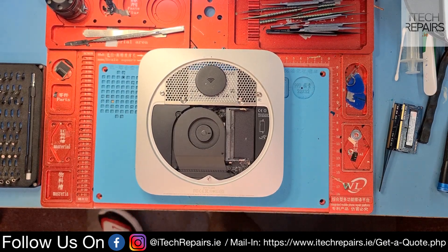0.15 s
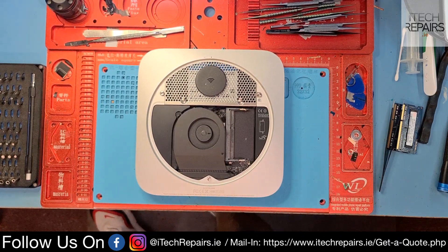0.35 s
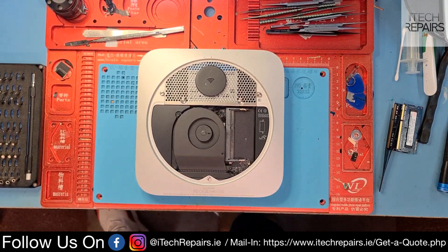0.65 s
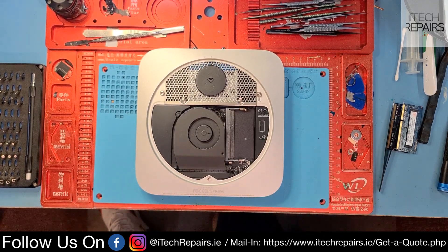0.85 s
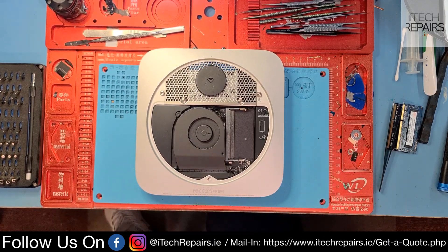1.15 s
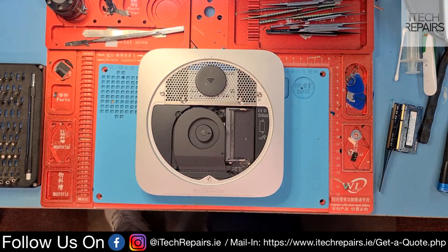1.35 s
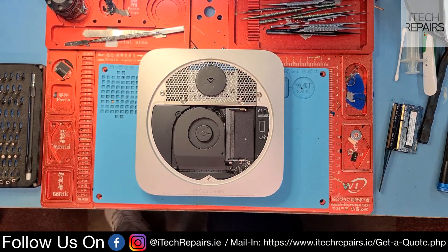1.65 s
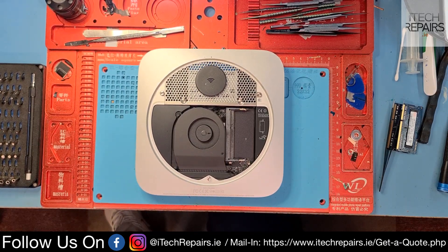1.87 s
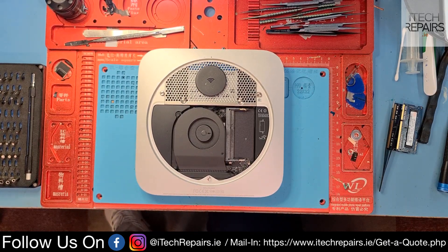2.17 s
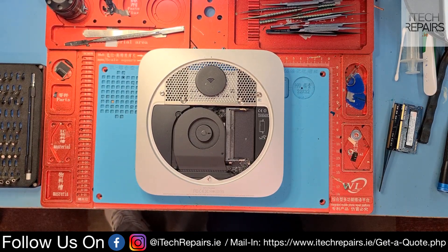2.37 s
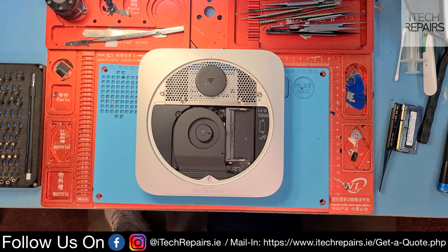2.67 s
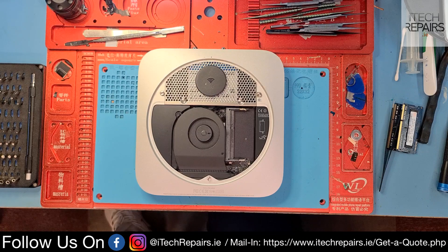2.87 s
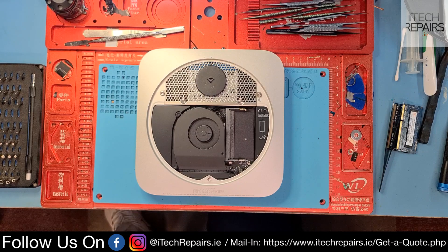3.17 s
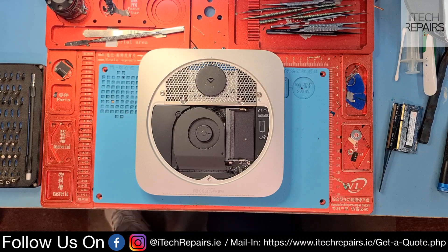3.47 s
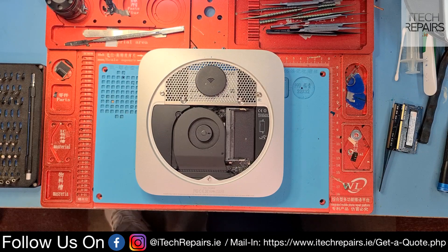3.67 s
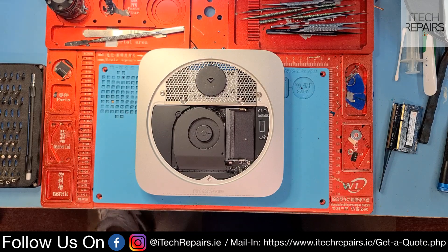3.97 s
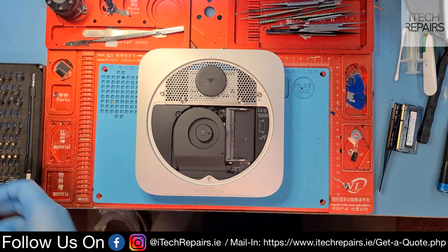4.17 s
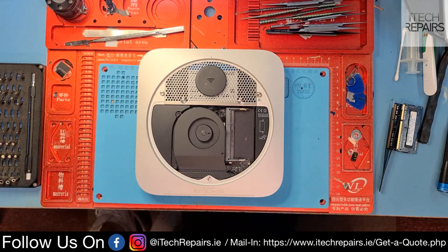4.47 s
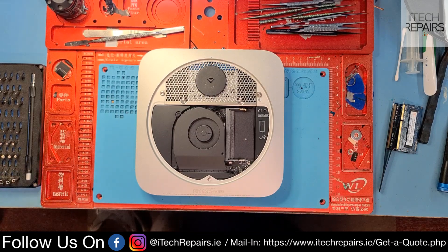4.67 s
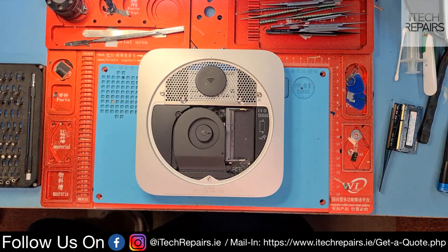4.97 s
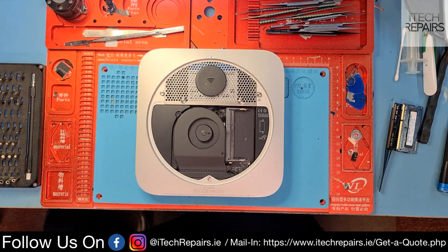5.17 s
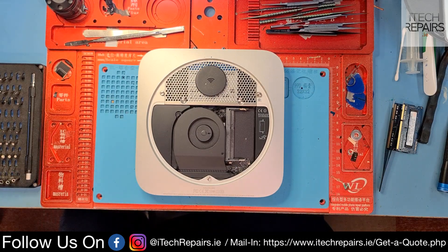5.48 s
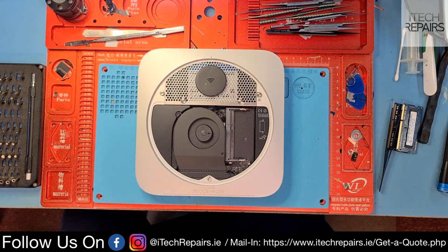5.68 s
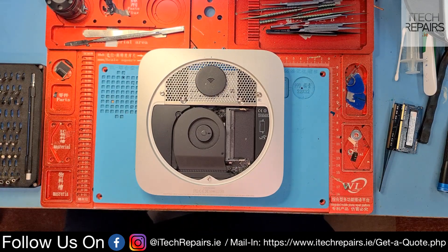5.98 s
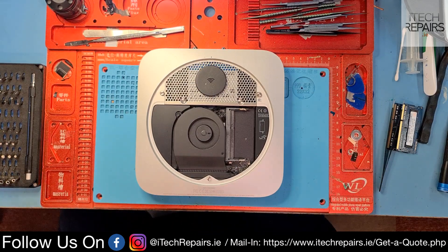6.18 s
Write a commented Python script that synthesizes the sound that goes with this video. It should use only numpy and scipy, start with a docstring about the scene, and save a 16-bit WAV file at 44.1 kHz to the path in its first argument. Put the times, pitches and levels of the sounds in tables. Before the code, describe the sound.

Close stereo microphones at a repair bench in a quiet, fairly live room. A soft thud, then light metal clinks and scuffs with low bench rumble in the first second. After a lull, plastic and circuit-board taps quicken around three seconds, with one firm snap. A loud, bright metal clatter rings to the right past four seconds, followed by a low slide, faint scuffs and a final click.

```python
"""A repair bench in a quiet, fairly live room, two microphones close to the work.
Plastic and circuit board tap and snap close by: brief noise cracks and damped modes.
Loose metal pieces clatter to the right, each blow ringing and followed by smaller bounces.
Fingers and small things scuff in runs of noisy slips; three slides and some blows shake the bench.
Sleeves brush over the bench, under them lies faint room air, and a dense noise tail is the room."""
import sys
import numpy as np
from scipy import signal
from scipy.fft import rfft, irfft
from scipy.io import wavfile
from scipy.ndimage import uniform_filter1d

SR = 44100
rng = np.random.default_rng(int(sys.argv[2]) if len(sys.argv) > 2 else 0)


def store_wav(level_fs):
    """Save 16-bit WAV to argv[1]."""
    pcm = np.round(np.clip(np.atleast_2d(level_fs), -1, 1) * 32767)
    wavfile.write(sys.argv[1], SR, pcm.T.astype(np.int16))


N = 279153
T = np.arange(N) / SR
HIT_T = T[:SR // 3]  # time axis of one short contact
LEAD_S = .01  # room for the graze ahead of each hit
# colour of a hard contact: f/Hz, relative level/dB per Hz
CONTACT_COLOUR = [(150, -12.5), (480, -1.5), (850, -4), (1150, 4.5), (2200, 1.5), (3800, -0.7),
                  (7000, -4.5), (11000, -0.5), (13300, -7.5)]


def taps(body_db=-2.5, ring_room_db=-6, favoured_t60=0.021, overtone_ratio=1.6, overtone_db=-12.5):
    """Each tap cracks and rings the plastic; the spot that is hit favours one mode and its overtone."""
    # light taps: t/s, level/dB, low knock/dB, treble/dB, favoured f/Hz, its ring/dB against the level,
    # contact/ms, room send/dB, left minus right/dB
    tap_list = [(0.345, -68.5, -4, -48, 1280, 12.5, 0.42, 5.5, -4),
                (1.0643, -46, -1.5, -20, 1890, -3.5, 1.8, 2.5, 0.5),
                (1.635, -73, 22, -34, 832, 20, 6.2, -9, -1), (2.539, -52, 6.5, -12, 1466, 1, 0.86, -2.5, 2),
                (2.740, -42, 3, -16, 1466, -6.5, 0.82, -3.5, 0.5),
                (2.949, -58.5, 9, -16, 2070, 12.5, 0.65, -4, 4),
                (2.970, -49.5, 0, -10, 2060, 14, 2.6, -10, 3),
                (2.98, -64.5, 2, 22, 2070, 29.5, 1.6, -8, -2),
                (3.0156, -37.5, 2.5, -12, 1560, -2, 0.96, -4.5, -2),
                (3.342, -37.5, 0, -15.5, 2030, -16, 0.86, -4.5, 2.5),
                (3.388, -45.5, 2, -16.5, 2090, 4, 0.38, -3, 3.5),
                (3.4582, -28.5, -6, -13, 875, -5, 0.65, -5, -2),
                (3.7172, -43.5, -11, 3, 1730, -4, 2.6, -3.5, -6),
                (3.7206, -47.5, -25, 8.5, 6630, -2.5, 0.71, -2.5, 6),
                (3.975, -58.5, 5, -13, 4580, -6, 0.099, 6, 6), (4.947, -61, 12, -10, 860, 6, 3.4, -2, -1),
                (5.4188, -60, 11, 0.5, 1990, 7, 1.9, 1.5, -1),
                (5.789, -53, 6.5, -63, 1727, -10, 1.5, 9, -5), (6.26, -44, -4, 7, 3056, 6, 1.6, -4.5, -1.5),
                (6.262, -63, -7, -15, 880, 13.5, 1.4, 2.5, -9)]
    # modes of the tapped plastic: f/Hz, relative level/dB, t60/s
    plastic_modes = [(587, 0.5, 0.016), (880, -19, 0.045), (1382, -8.5, 0.0053), (1774, 5, 0.015),
                     (2138, -2.5, 0.031), (3500, 0.5, 0.012), (4540, -16.5, 0.032), (5890, -10, 0.025)]
    near, sent = np.zeros((2, 2, N))
    for s, db, low_db, top_db, hz, ring_db, contact_ms, room_db, pan_db in tap_list:
        snap = undb(db) * tone(crack(contact_ms, apart_hz=3550), low_db, top_db)
        snap = colour(snap, [(9000, -2.5), (14000, -8.0)])  # plastic is softer than metal
        body = undb(db + body_db) * tone(ring(plastic_modes, contact_ms, spread=0.27), low_db, top_db)
        pitches = [(hz, 0, favoured_t60), (overtone_ratio * hz, overtone_db, favoured_t60)]
        favoured = undb(db + ring_db) * ring(pitches, 1.22 * contact_ms, spread=0.59)
        pan = undb(np.array([[pan_db], [-pan_db]]) / 2)
        add(near, s - LEAD_S, (bench(snap + body) + favoured) * pan)
        # rings carry less far than cracks
        add(sent, s - LEAD_S, (snap + undb(ring_room_db) * (body + favoured)) * undb(room_db))
    return near, sent


def clatter(lag_ms=.32, side_db=2.0, shimmer_db=-6, shimmer_t60=0.076, detune=0.0053):
    """Metal pieces strike and bounce right of the microphones; their ring comes from all over the metal."""
    # metal pieces knocking together: t/s, level/dB, low knock/dB, treble/dB, contact/ms,
    # ring/dB against the level, room send/dB
    clatter_list = [(.686, -37, 2.5, -5, 0.42, -4, -17), (.696, -46.5, 14, -2, 1.4, -4, 3),
                    (.977, -50.5, 0, -5.5, 0.87, -1.5, -2), (1.194, -51.5, -15, -1, 0.85, -7.5, 0),
                    (4.3437, -39.5, -10.5, 2, 2.6, 2.5, -13.5), (4.3557, -25, -1, -1, 0.51, 4, -15.5),
                    (4.3667, -28, 4.5, -9, 1.04, -2, -6.5), (4.517, -46.5, 6.5, -4, 1.7, -6, -20)]
    # modes of the metal pieces: f/Hz before detuning, relative level/dB, t60/s
    metal_modes = [(315.6, -18, 0.53), (820, -14, 0.11), (1211, -15.5, 0.12), (1760, 0.5, 0.07),
                   (2075, -3.5, 0.13), (2180, -0.5, 0.12), (2310, 1, 0.061), (2412, -2, 0.088),
                   (2476, 5.5, 0.055), (2800, -11, 0.082), (3044, -5.5, 0.13), (3140, 2, 0.05)]
    near, sent = np.zeros((2, 2, N))
    for s, db, low_db, top_db, contact_ms, ring_db, room_db in clatter_list:
        # pieces lying on each other ring a little differently at every blow
        modes = [(hz * (1 + detune * rng.standard_normal()), mode_db, t60)
                 for hz, mode_db, t60 in metal_modes]
        # the left microphone hears the strike softer and later
        strike = crack(contact_ms, apart_hz=6100) * undb([[-side_db], [side_db]])
        strike[0] = np.roll(strike[0], int(lag_ms * SR / 1000))
        shimmer = undb(shimmer_db) * small_part(shimmer_t60, contact_ms, count=48)
        ringing = undb(ring_db) * ring(modes, contact_ms, spread=0.89)
        hit = undb(db) * tone(strike + shimmer + ringing, low_db, top_db)
        hit = signal.fftconvolve(hit, rattle(), axes=1)
        add(near, s - LEAD_S, hit)
        add(sent, s - LEAD_S, hit * undb(room_db))
    return near, sent


def scuffs(grain_db=16.0, catch_db=1.5, part_db=-2, sag_octaves_per_s=.6, rub_room_db=-6):
    """Crackling slips swell and fade, hiss and ring a resonance that sinks as the contact moves along."""
    # fingers and small things rubbing: t/s, length/s, level/dB sent to the room (scene() lifts the near sound),
    # resonance f/Hz halfway through, its width/Hz, hiss/dB against the near resonance
    scuff_list = [(0.638, 0.043, -58.5, 2220, 494, -8), (0.701, 0.088, -57, 2640, 1200, -8),
                  (0.852, 0.073, -59.5, 2430, 600, -0.5), (0.983, 0.1, -67.5, 2170, 500, -4.5),
                  (1.079, 0.098, -69, 2080, 600, 4.5), (2.238, 0.035, -60, 1760, 300, -16),
                  (2.922, 0.095, -59, 1770, 350, -14), (3.177, 0.058, -70.5, 1860, 300, -23),
                  (3.582, 0.05, -76.5, 1700, 600, 2.5), (3.63, 0.081, -73.5, 2240, 220, -4),
                  (4.142, 0.28, -76.5, 1930, 500, -4.5), (4.388, 0.17, -57, 2060, 894, -15),
                  (4.588, 0.023, -67, 3820, 300, 5), (4.955, 0.056, -64, 3960, 350, 3),
                  (5.416, 0.007, -56.5, 2870, 395, -13), (5.401, 0.31, -71.5, 854, 109, -30),
                  (5.673, 0.02, -65, 3700, 880, -30), (5.736, 0.023, -66.5, 4500, 250, 0.5),
                  (5.785, 0.027, -62.5, 2080, 350, -35), (5.936, 0.02, -70.5, 4470, 251, -11)]
    near, sent = np.zeros((2, 2, N))
    count = len(HIT_T)
    for s, length, db, hz, width_hz, hiss_db in scuff_list:
        # each slip holds its own random level for a third of a millisecond
        slips = np.repeat(undb(grain_db * rng.uniform(-1, 1, count)), SR // 3000)[:count]
        # the grip tightens and lets go
        grip_walk = unit(uniform_filter1d(rng.standard_normal(count), size=400))
        catches = undb(catch_db * grip_walk)
        swell = np.sqrt(np.sin(np.pi * np.minimum(HIT_T / length, 1)).clip(0))
        friction = bench(pair(count, apart_hz=2500) * slips * catches * swell)
        grains = unit(colour(friction, CONTACT_COLOUR))
        sinking_hz = hz * 2 ** (-sag_octaves_per_s * (HIT_T - length / 2))
        rub = unit(resonate(grains, sinking_hz, width_hz))
        part_ring = small_part(0.05, rise_ms=.6, count=14)
        part = unit(signal.fftconvolve(friction, part_ring, axes=1)[:, :count])
        hiss = undb(hiss_db) * unit(tone(grains, -2.0, 0) + undb(part_db) * part)
        gain = undb(db) * np.sqrt(np.mean(swell ** 2))
        add(near, s, gain * (rub + hiss))
        add(sent, s, gain * (undb(rub_room_db) * rub + hiss))
    return near, sent


def rumble(boom_rise_s=0.03, knock_rise_s=0.011):
    """Slides and blows shake the bench at its low resonances; each blow also gives a short hollow knock."""
    # something sliding: t/s at full speed, length/s, rumble level/dB
    slide_list = [(0.896, 0.098, -42), (4.56, 0.33, -44), (5.8, .53, -58)]
    # blows that reach the bench: t/s, boom level/dB, hollow knock level/dB
    thud_list = [(0.344, -51, -53.5), (0.702, -43.5, -51.5), (1.065, -57, -57.5), (5.788, -74, -55),
                 (6.259, -48.5, -53)]
    # low resonances of the bench: f/Hz, relative level/dB per Hz
    shake_colour = [(22, -27), (31, -12), (41, 2), (52, -7), (66, 4), (85, -8), (125, -10.5), (165, -25.5),
                    (280, -28), (520, -62)]
    # hollow knock: f/Hz, relative level/dB per Hz
    knock_colour = [(70, -29), (170, 6.5), (340, 6.5), (520, -9), (1200, -58)]
    shake = unit(colour(pair(N, apart_hz=700), shake_colour, size=16384))
    shake = shake / np.sqrt(uniform_filter1d(np.mean(shake ** 2, axis=0), size=2500))  # an even push
    hollow = unit(colour(pair(N, apart_hz=700), knock_colour))
    slides = sum(undb(db) * stroke(s, length, rise_db_per_s=103.5, sag_db_per_s=13, stop_db_per_s=172)
                 for s, length, db in slide_list)
    booms = sum(undb(boom_db) * jolt(s, boom_rise_s) for s, boom_db, _ in thud_list)
    knocks = sum(undb(knock_db) * jolt(s, knock_rise_s) for s, _, knock_db in thud_list)
    return shake * np.hypot(slides, booms) + hollow * knocks


def background(air_db=-66.5, flicker_db=1.5):
    """Faintly wavering room air, and cloth that brushes unevenly with each arm movement."""
    # arm movements that brush a sleeve over the bench: t/s at full speed, length/s, level/dB
    brush_list = [(0, 0.019, -65.5), (0.714, 0.15, -58), (4.262, 0.14, -64), (5.15, 0.071, -69),
                  (5.844, 0.7, -66.5)]
    # brushing cloth: f/Hz, relative level/dB per Hz
    cloth_colour = [(100, -12), (280, 2), (600, -9.5), (1300, -10.5), (4000, -23), (12000, -33.5)]
    # quiet room air: f/Hz, relative level/dB per Hz
    air_colour = [(25, -12.5), (55, -5.5), (120, -13), (200, -13), (320, -8.5), (450, -20.5), (700, -20.5),
                  (1500, -31.5), (1900, -27), (3000, -37.5), (5400, -44.5), (7300, -38), (9000, -48.5),
                  (12500, -42), (15500, -61)]
    air = undb(air_db) * unit(colour(waver(pair(N, apart_hz=600)), air_colour, size=8192))
    flicker = unit(uniform_filter1d(rng.standard_normal(N), size=2400))
    cloth = unit(colour(pair(N, apart_hz=650), cloth_colour))
    # the negative sag lets a brush grow slightly
    moves = [undb(db) * stroke(s, length, rise_db_per_s=46.5, sag_db_per_s=-1, stop_db_per_s=29)
             for s, length, db in brush_list]
    return air + cloth * np.max(moves, axis=0) * undb(flicker_db * flicker)


def room(x, first_s=0.0053, early_db=7.0, early_s=0.031):
    """Dense reflections: strong early ones from bench and walls, then a tail whose top dies soonest."""
    # decay of the tail: f/Hz, t60/s
    room_t60 = [(200, 0.45), (2500, 0.32), (7000, 0.42), (14000, 0.21)]
    hz, s, frames = signal.stft(pair(SR, apart_hz=600), SR, nperseg=256)
    fade = undb(-60 * s / at(room_t60, hz)[:, None])
    tail = signal.istft(frames * fade, SR)[1][:, :SR]
    t = T[:SR]
    onset = 1 - np.exp(-(t / first_s) ** 2)
    tail = tail * onset * undb(early_db * np.exp(-t / early_s))
    tail = tail / np.sqrt(np.sum(tail ** 2) / 2)
    wet = signal.fftconvolve(x, tail, axes=1)[:, :N]
    return colour(wet, [(300, 4.5), (2200, 2.0), (5000, -0.5), (12000, 0.5)])


def crack(contact_ms, apart_hz, graze_db=-16, graze_length=6.5):
    """Two rough surfaces graze, then meet in a brief burst; slower contacts graze for longer."""
    age = (HIT_T - LEAD_S) * 1000 / contact_ms  # in contact lengths, as is graze_length
    pressed = np.maximum(age, 0)
    burst = np.sqrt(pressed) * np.exp(-pressed)
    graze = undb(graze_db) * np.exp(-abs(age) / graze_length) * np.minimum(HIT_T / LEAD_S, 1)
    return blow(colour(pair(len(HIT_T), apart_hz) * (burst + graze), CONTACT_COLOUR))


def ring(modes, rise_ms, spread):
    """Damped modes build up in the contact; higher ones differ more in phase between microphones."""
    t, out = np.maximum(HIT_T - LEAD_S, 0), 0
    for hz, db, t60 in modes:
        phase_gap = spread * np.sqrt(hz / 1500) * rng.standard_normal((2, 1))
        phase = rng.uniform(0, 2 * np.pi) + phase_gap
        out = out + undb(db - 60 * t / t60) * np.sin(2 * np.pi * hz * t + phase)
    return blow(out * (1 - np.exp(-(t * 1000 / rise_ms) ** 2)))


def small_part(t60, rise_ms, count):
    """The crowded high modes of a small piece, different wherever it is touched."""
    modes = [(hz, at(CONTACT_COLOUR, hz), t60) for hz in rng.uniform(3400, 12800, size=count)]
    return ring(modes, rise_ms, spread=0.9)


def tone(x, low_db, top_db):
    """Heavier blows carry more bass, harder ones more treble."""
    return colour(x, [(850, low_db), (1400, 0), (3000, 0.0057), (8000, top_db)])


def bench(x, echo_db=-5, shortest_ms=.9, longest_ms=3.5):
    """The bench top returns each contact a moment later, which gives it a hollow colour of its own."""
    lag = int(rng.uniform(shortest_ms, longest_ms) * SR / 1000)
    return (x + undb(echo_db) * np.roll(x, lag, axis=1)) / np.hypot(1, undb(echo_db))


def rattle(bounce_db=-17, bounce_s=.035, count=15):
    """A blow and the smaller, irregular bounces that follow it, of either sign."""
    train = np.zeros((1, len(HIT_T)))
    train[0, 0] = 1
    for s in rng.uniform(0.069, 2, count) * bounce_s:
        # the factor of 2 lifts every bounce by 6 dB
        train[0, int(s * SR)] += undb(bounce_db) * np.exp(-s / bounce_s) * rng.choice([-2, 2])
    return train


def resonate(x, hz, width_hz):
    """A resonance whose centre follows the curve hz."""
    turn = np.exp(2j * np.pi * np.cumsum(hz) / SR)
    pole = np.exp(-np.pi * abs(width_hz) / SR)
    return np.real(turn * signal.lfilter([1], [1, -pole], x / turn))


def stroke(start, length, rise_db_per_s, sag_db_per_s, stop_db_per_s):
    """Gain of one movement: it gathers speed up to start, drifts at the sag rate, then stops."""
    age = T - start
    rise = rise_db_per_s * np.minimum(age, 0)
    sag = sag_db_per_s * np.clip(age, 0, length)
    stop = stop_db_per_s * np.maximum(age - length, 0)
    return undb(rise - sag - stop)


def jolt(start, rise_s):
    """Gain of one blow: it peaks after rise_s and dies away."""
    age = np.maximum(T - start, 0) / rise_s
    return age * np.exp(1 - age)


def waver(x, depth_db=2.5):
    """Let each narrow band of a steady sound swell and fade, much like its neighbour."""
    _, _, frames = signal.stft(x, SR, nperseg=1024)
    walk = unit(uniform_filter1d(rng.standard_normal(frames.shape[1:]), size=14, axis=1))
    walk = unit(walk + np.roll(walk, 1, axis=0))
    return unit(signal.istft(frames * undb(depth_db * walk), SR)[1][:, :N])


def pair(count, apart_hz):
    """Noise at two microphones: alike in the bass, unrelated well above apart_hz."""
    mid, side = rfft(rng.standard_normal((2, count)))
    hz = np.fft.rfftfreq(count, 1 / SR)
    side = side * hz / np.hypot(hz, apart_hz)
    return irfft(np.array([mid + side, mid - side]), count)


def colour(x, points, size=2048):
    """Causal (minimum-phase) filter with the given (Hz, dB) response."""
    cepstrum = irfft(np.log(undb(at(points, np.fft.rfftfreq(size, 1 / SR)))))
    cepstrum[1:size // 2] *= 2
    cepstrum[size // 2 + 1:] = 0
    response = irfft(np.exp(rfft(cepstrum)))
    return signal.fftconvolve(x, response[None], axes=1)[:, :x.shape[1]]


def add(track, s, sound):
    """Mix a sound in at time s."""
    start = int(s * SR)
    part = sound[:, :max(N - start, 0)]
    track[:, start:start + part.shape[1]] += part


def undb(db):
    """Decibels to gain."""
    return 10 ** (np.asarray(db) / 20)


def at(points, hz):
    """Read (Hz, value) points on a log-frequency axis."""
    f, v = np.transpose(points)
    return np.interp(np.log(np.maximum(hz, 1)), np.log(f), v)


def unit(x):
    """Scale to rms 1."""
    return x / np.sqrt(np.mean(x ** 2))


def blow(x):
    """Scale each channel to the energy of 5 ms at rms 1."""
    return x / np.sqrt(np.sum(x ** 2, axis=-1, keepdims=True) / (.005 * SR))


def scene(scuff_near_db=3):
    """All the handling, its reflections and the quiet room."""
    tap_near, tap_sent = taps()
    metal_near, metal_sent = clatter()
    scuff_near, scuff_sent = scuffs()
    near = tap_near + metal_near + undb(scuff_near_db) * scuff_near
    reflections = room(tap_sent + metal_sent + scuff_sent)
    return near + reflections + rumble() + background()


def record(dry, top_hz=15800):
    """The left microphone is brighter around 6.5 kHz, the right above 10 kHz; the top is cut."""
    left = colour(dry[:1], [(3000, -2.1), (6500, 2.4), (10000, -1.0)])
    right = colour(dry[1:], [(3000, -1.5), (6500, -1.2), (10000, 0.86)])
    top_cut = signal.ellip(8, .2, 70, top_hz, fs=SR, output="sos")
    return signal.sosfilt(top_cut, np.vstack([left, right]))


dry = scene()
out = record(dry)
store_wav(out)
```